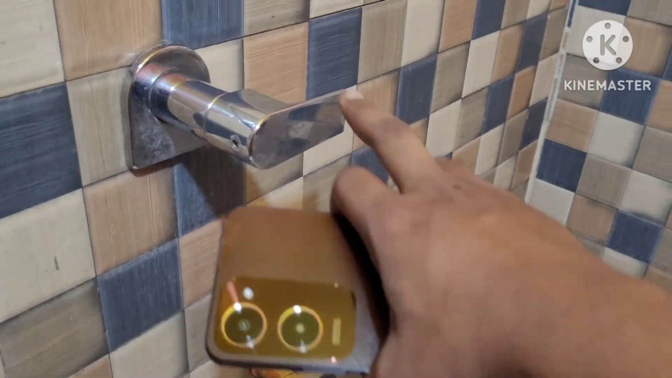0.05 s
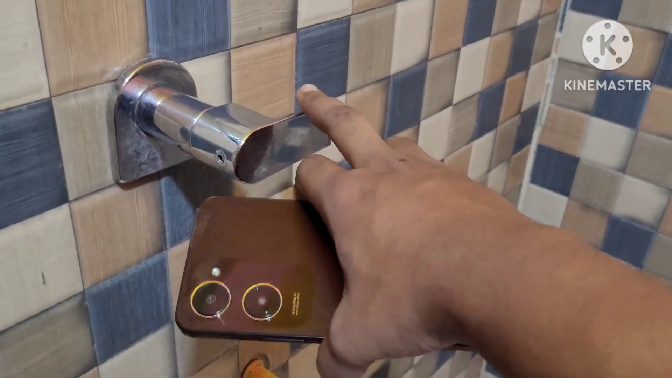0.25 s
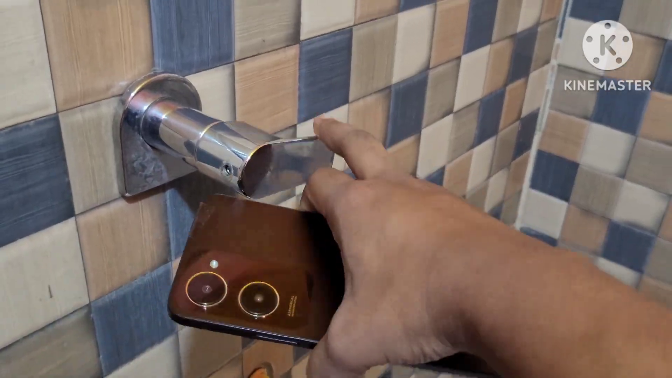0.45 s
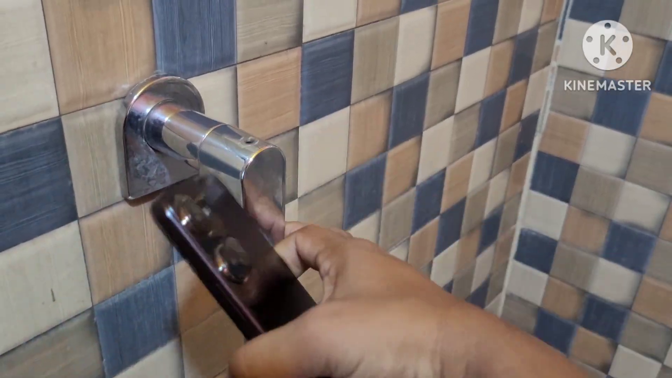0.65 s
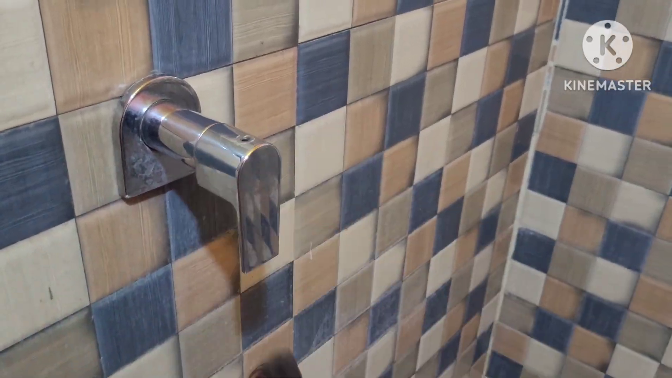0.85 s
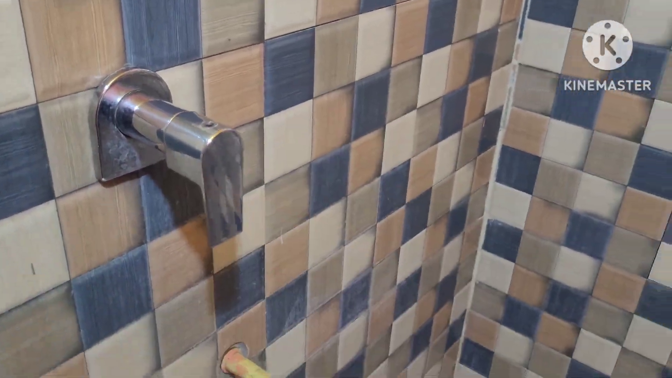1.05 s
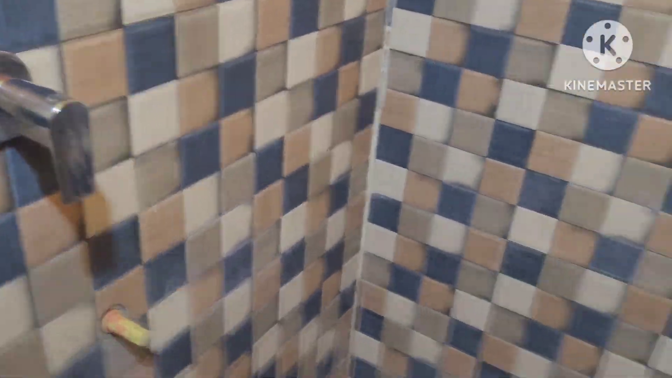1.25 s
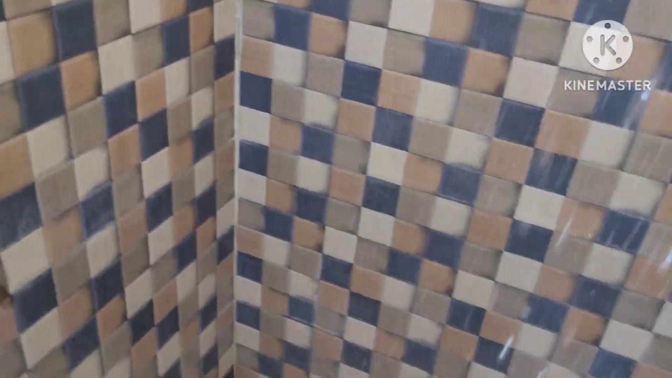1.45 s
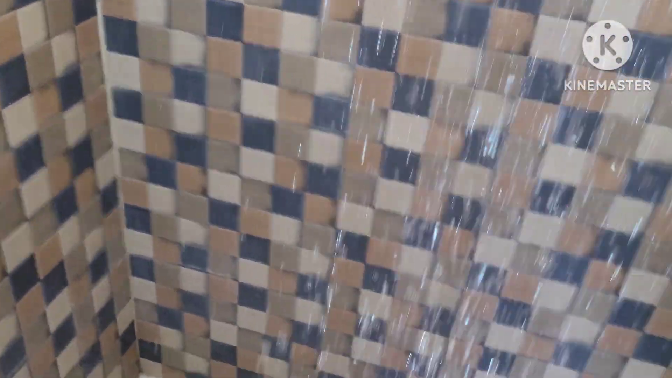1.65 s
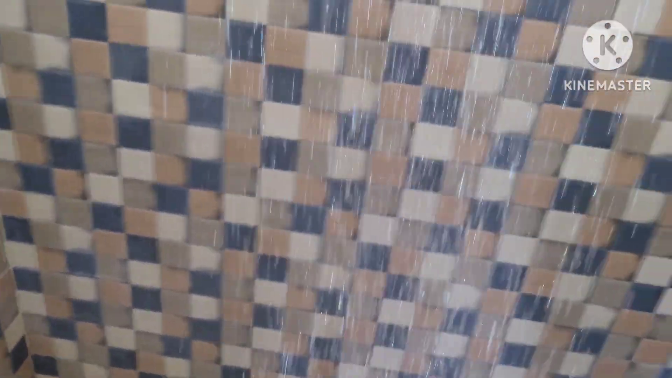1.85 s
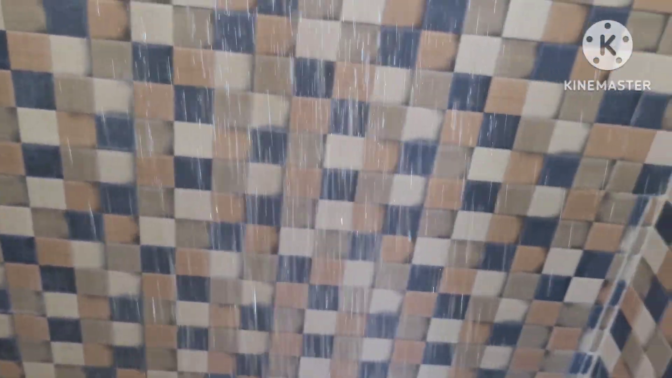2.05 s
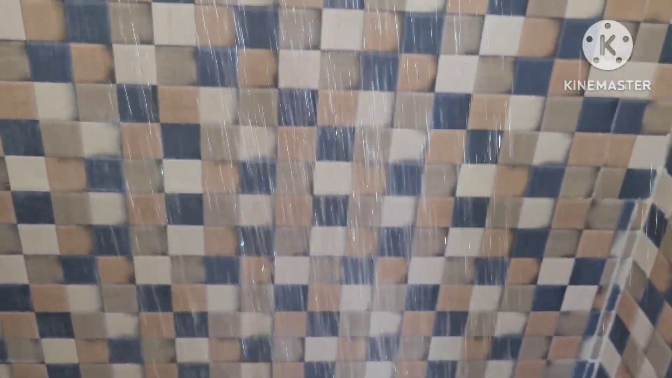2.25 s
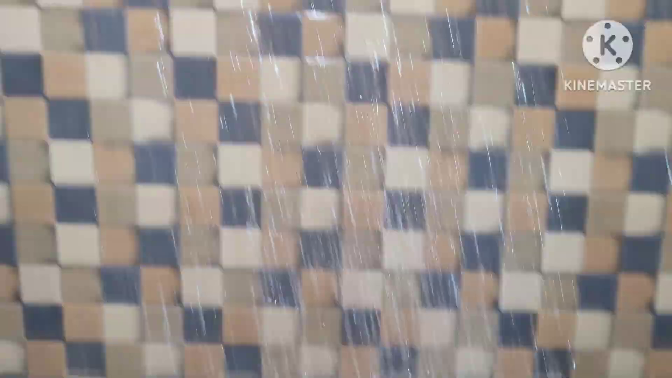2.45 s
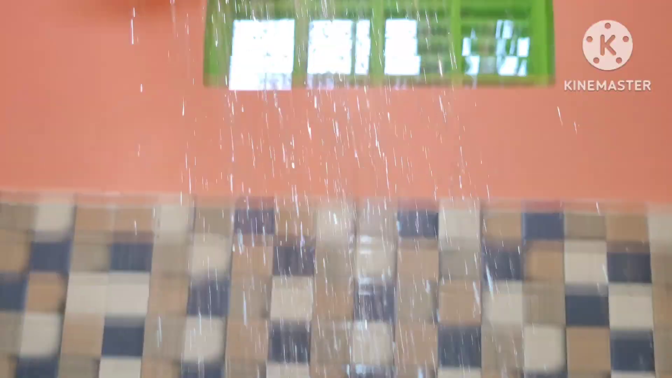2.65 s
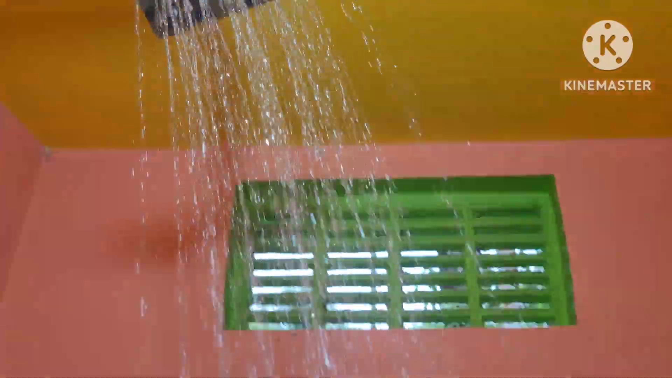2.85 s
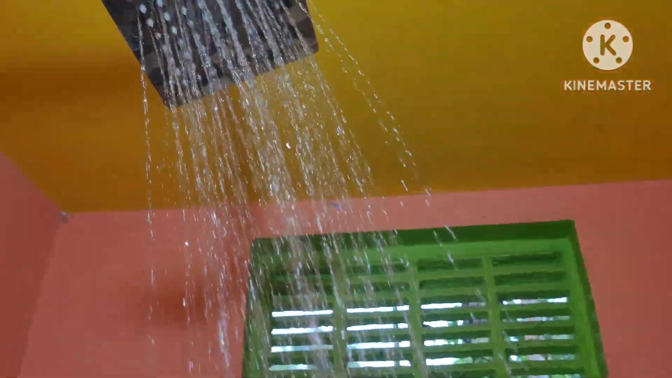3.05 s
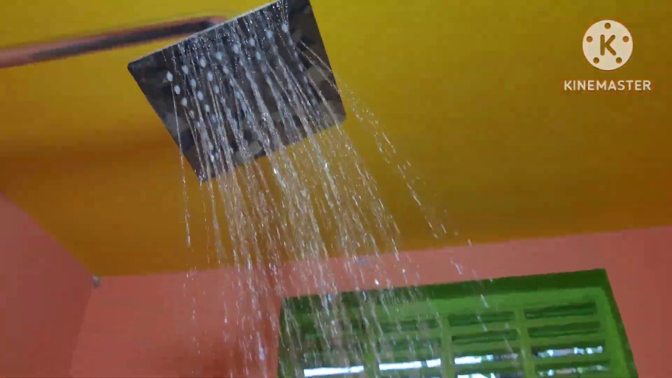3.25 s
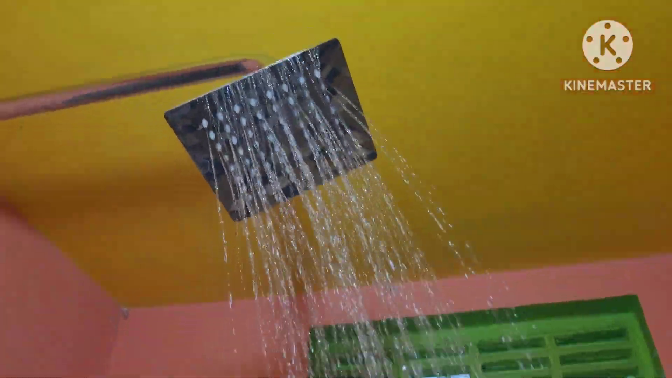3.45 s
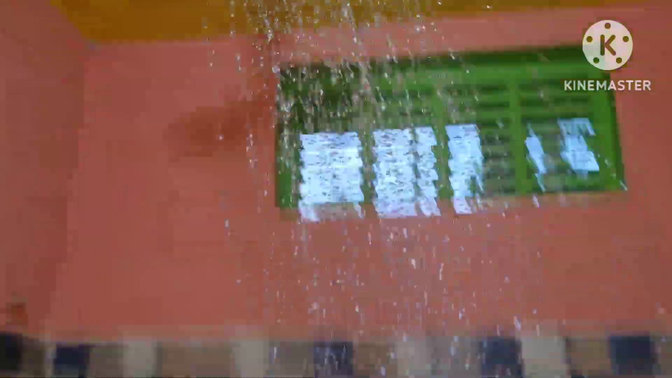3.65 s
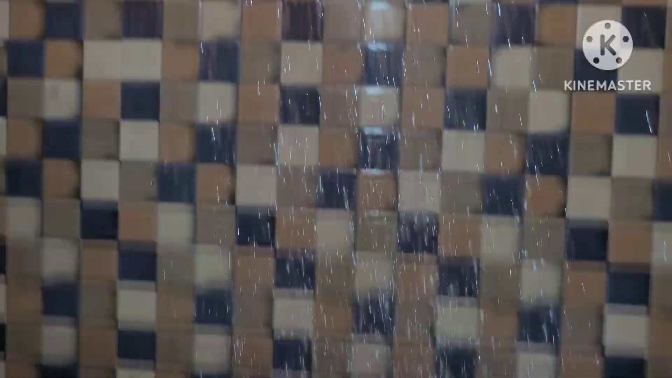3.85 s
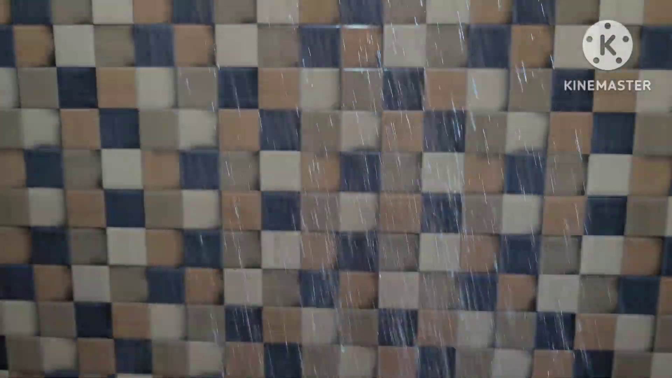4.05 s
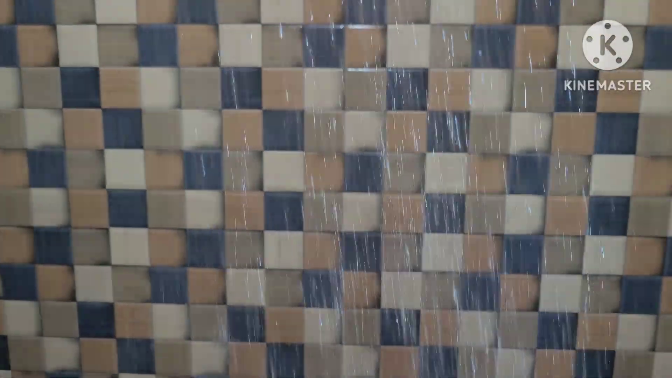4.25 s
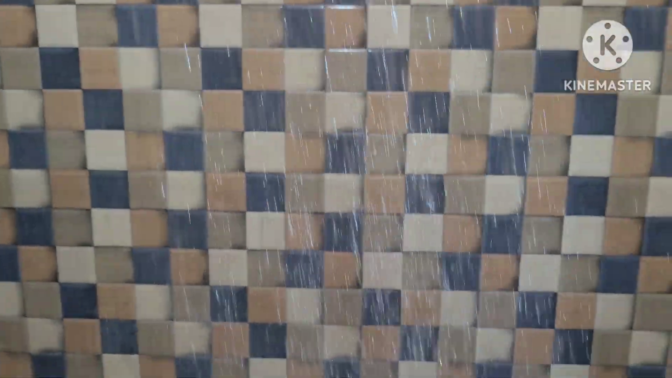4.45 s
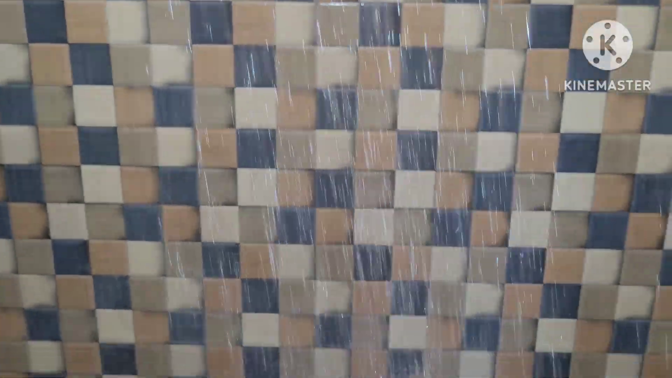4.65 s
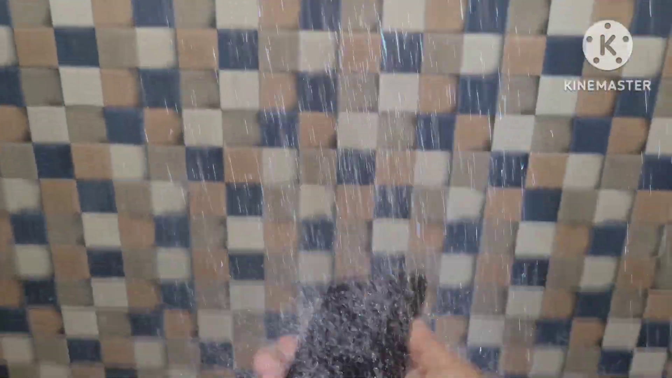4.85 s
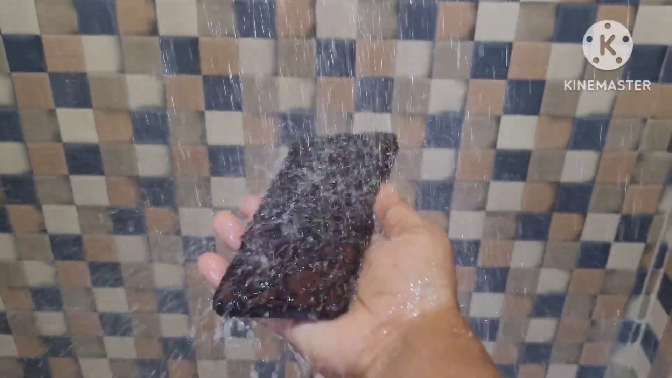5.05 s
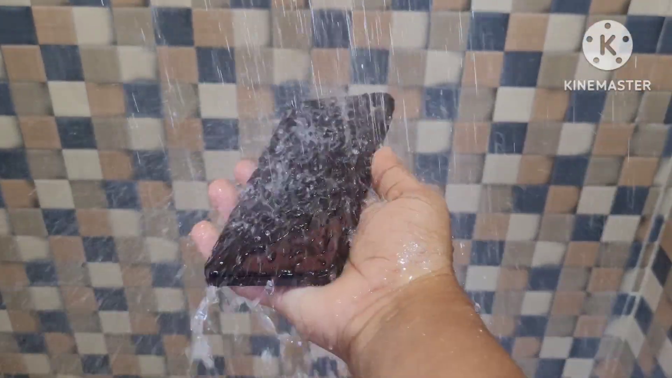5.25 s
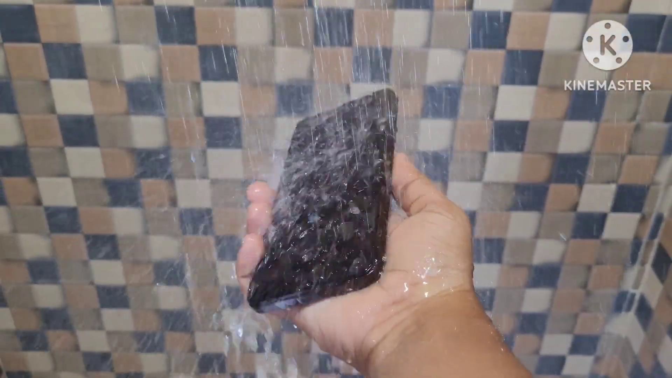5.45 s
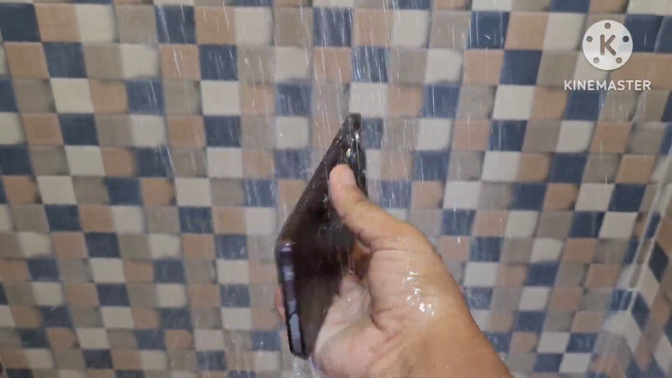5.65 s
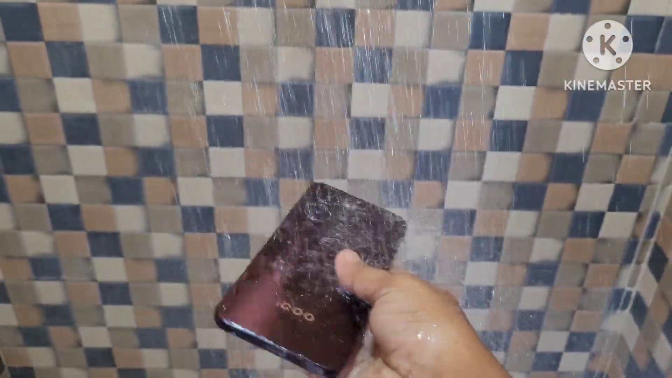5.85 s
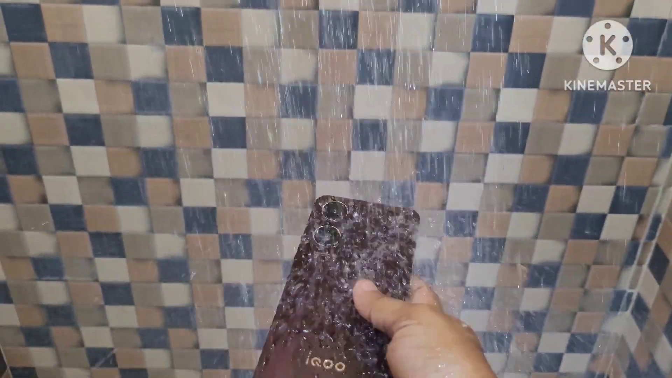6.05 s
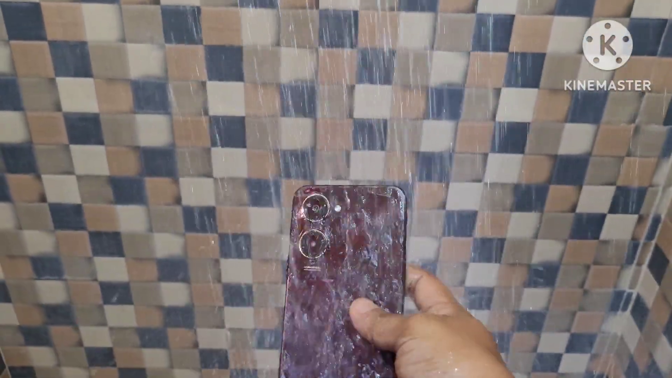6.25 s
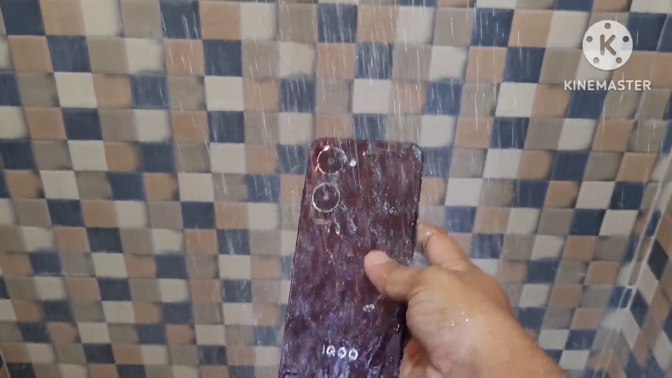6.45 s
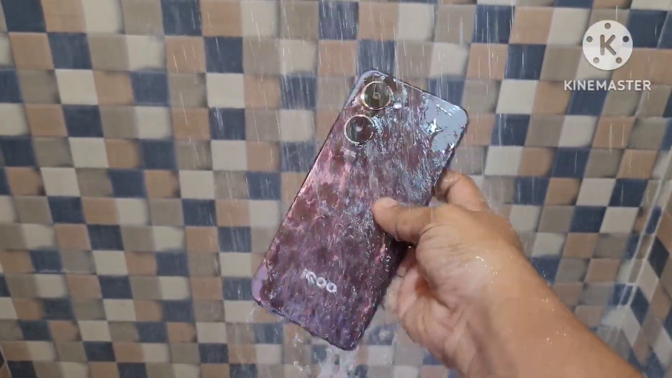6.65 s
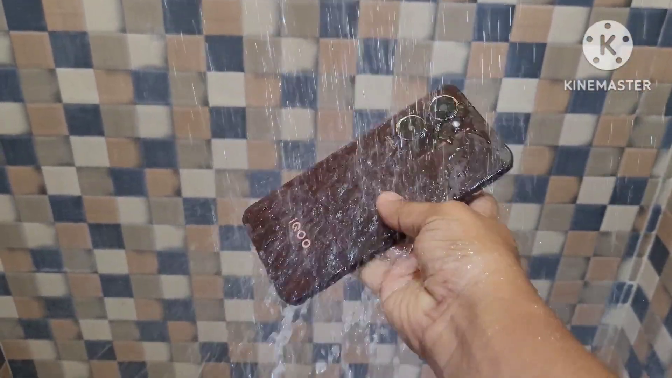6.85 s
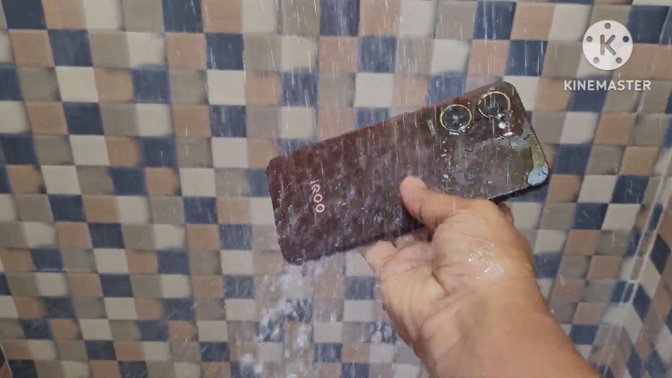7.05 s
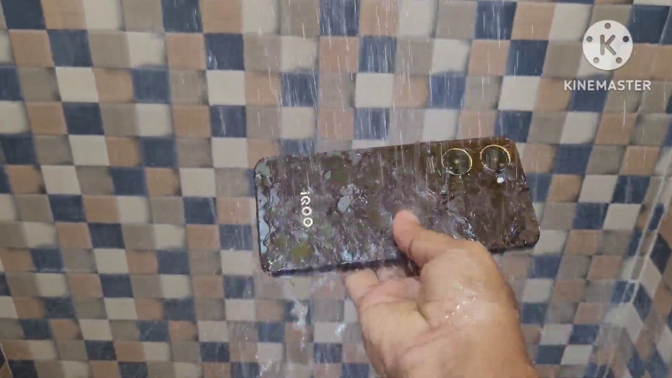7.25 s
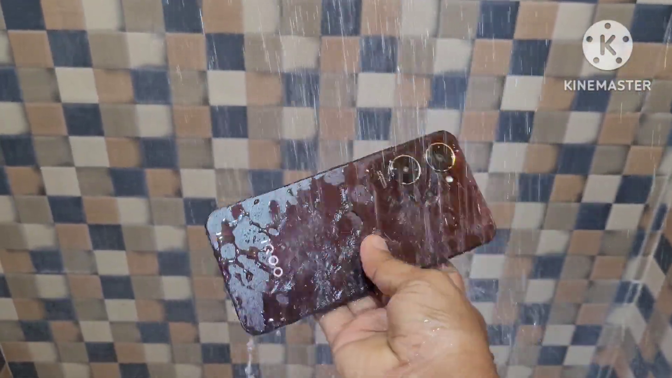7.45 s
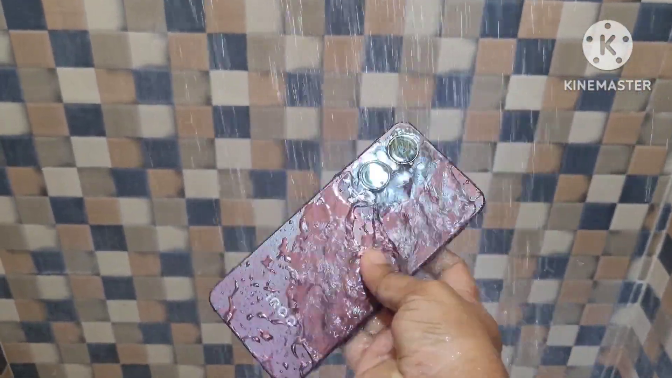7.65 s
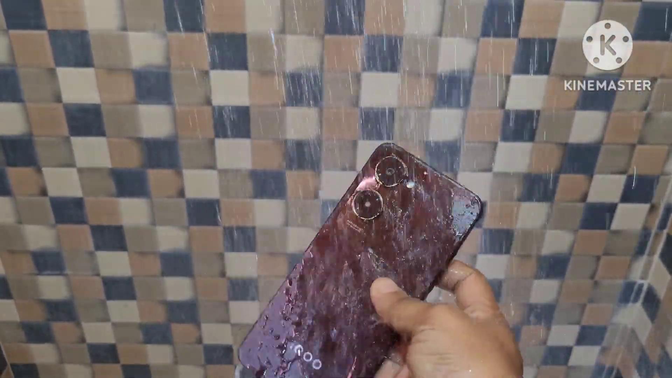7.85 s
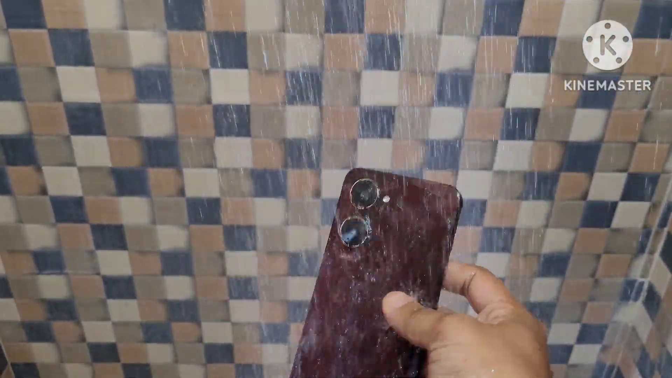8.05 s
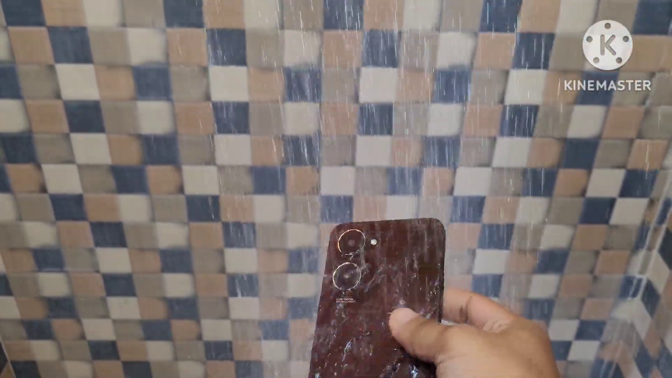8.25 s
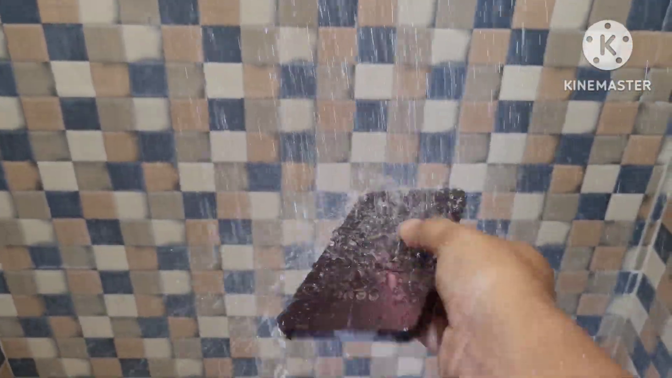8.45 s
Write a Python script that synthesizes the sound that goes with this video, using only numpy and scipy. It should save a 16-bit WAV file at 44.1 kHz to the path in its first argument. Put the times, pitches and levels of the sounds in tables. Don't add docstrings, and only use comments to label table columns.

```python
import sys
import numpy as np
from scipy import signal
from scipy.fft import rfft, irfft, next_fast_len
from scipy.io import wavfile
from scipy.ndimage import uniform_filter1d, map_coordinates

SR = 44100
rng = np.random.default_rng(int(sys.argv[2]) if len(sys.argv) > 2 else 0)


def digitize_waveform(pressure):
    field = np.atleast_2d(pressure).T
    bounded = np.clip(field, -1, 1)
    quanta = np.round(bounded * 32767).astype(np.int16)
    wavfile.write(sys.argv[1], SR, quanta)


def linear_from_db(decibels):
    return 10 ** (np.asarray(decibels, float) / 20)


N = 375291


def unit(x):
    return x / np.sqrt(np.mean(x ** 2) + 1e-20)


def along(points, hz):
    f, v = np.transpose(points)
    return np.interp(np.log(hz + 1), np.log(f + 1), v)


def curves(rows):
    s, *cols = np.transpose(rows)
    t = np.arange(N) / SR
    return [np.interp(t, s, c) for c in cols] + [(t >= s[0]) & (t <= s[-1])]


def gains(rows):
    level_db, on = curves(rows)
    return on * linear_from_db(level_db)


def wobble(rate):
    knots = rng.standard_normal(int(N * rate / SR) + 4)
    return map_coordinates(knots, [np.arange(N) * rate / SR])


def filtered(x, response):
    m = next_fast_len(x.shape[-1] + 8192)
    return irfft(rfft(x, m) * response(np.fft.rfftfreq(m, 1 / SR)), m)[..., :x.shape[-1]]


def add(track, s, piece):
    part = track[:, round(s * SR):][:, :piece.shape[-1]]
    part += piece[..., :part.shape[-1]]


def drops(n, spread_db, wet):
    size = np.minimum(rng.exponential(size=(2, n)), 4)
    sharp = rng.standard_normal((2, n)) * linear_from_db(spread_db * size)
    wet = np.clip(wet, 0, 1)
    return np.sqrt(1 - wet) * unit(sharp) + np.sqrt(wet) * rng.standard_normal((2, n))


def room(hz):
    # (frequency [Hz], width [Hz], level [dB])
    modes = [(106, 3, 8.5), (176, 9.9, 4.5), (204.2, 10, 9), (269, 10.6, 8.5), (303, 11.5, 3.5),
             (339, 7.3, 9.5), (393.8, 5.4, 7), (454, 5.1, 9.5), (530, 19, 5.5), (609, 7.3, 7), (711, 11, 6),
             (789.5, 14.3, 6), (882, 9.6, 3.5), (1010.6, 18.3, 6.5), (1084, 7.6, 1), (1180, 5.9, 1),
             (1236, 7.7, 3.5), (1330, 12, 3), (1412, 8.1, 1), (1473, 12, 3), (1700, 12.5, 4.5),
             (1734, 12, -1), (1810, 8.6, 8), (1850, 7.6, -2), (1905, 6.4, 6), (1983, 12, 4.5),
             (2150, 12, 2.5)]
    low_hz = np.arange(0, 4000, .25)
    gain = 1
    for centre, width, db in modes:
        gain = gain + linear_from_db(db) * width ** 2 / (width ** 2 + 4 * (low_hz - centre) ** 2)
    return np.interp(hz, low_hz, gain)


def rush(spectrum, patchy_db, spread_db, wet, count=N):
    # (frequency [Hz], correlation [-])
    alike = [(60, 0.94), (130, .6), (290, 0.88), (640, 0.85), (1000, 0.35), (1600, 0.081), (3100, 0.054),
             (6800, 0)]
    z = signal.stft(drops(count, spread_db, wet), nperseg=512)[2]
    field = uniform_filter1d(rng.standard_normal(z.shape[1:]), 8, 0)
    field = uniform_filter1d(field, 8, 1)
    pair = signal.istft(z * linear_from_db(patchy_db * unit(field)), nperseg=512)[1][:, :count]

    def mid_side(hz):
        turn = np.arccos(np.clip(along(alike, hz), -1, 1)) / 2
        return room(hz) * linear_from_db(along(spectrum, hz)) * [np.cos(turn), np.sin(turn)]

    mid, side = filtered(pair, mid_side)
    return np.pad(unit(np.array([mid + side, mid - side])), [(0, 0), (0, N - count)])


def splashes(rows, trim_db, crack_db, tail_db, tail_s, shared):
    out, t = np.zeros((2, N)), np.arange(SR // 2) / SR
    for s, db, centre_hz, t60, octaves in rows:
        band = lambda hz: np.exp(-.5 * (np.log2((hz + 1) / centre_hz) / octaves) ** 2)
        rise = 1 - np.exp(-t * centre_hz / 3)
        crack = linear_from_db(crack_db - 60 * t / 0.084)
        shape = rise * (crack + linear_from_db(-60 * t / t60) + linear_from_db(tail_db - 60 * t / tail_s))
        pair = drops(len(t), spread_db=4.5, wet=0.37)
        add(out, s, linear_from_db(db + trim_db) * shape * unit(filtered(pair + shared * pair[::-1], band)))
    return out


def tilted(x):
    # (time [s], left port lag [ms])
    lag = [
        (0, 0.11),
        (1.5, 0.25),
        (2.6, 0.23),
        (4, 0.22),
        (4.6, 0.012),
        (8.6, 0.035),
    ]
    sway_ms, sway_rate_hz = .1, 6
    late = np.interp(np.arange(N) / SR, *np.transpose(lag)) * SR / 1000
    at = np.arange(N) + sway_ms * wobble(sway_rate_hz) * SR / 1000
    return np.array([map_coordinates(x[0], [at - late]), map_coordinates(x[1], [at])])


def still_air():
    # (frequency [Hz], density [dB per Hz])
    quiet = [(15, -38), (25, -6.5), (113, -15), (136, -13), (253, -19.5), (282, -15), (332, -17),
             (948, -25), (2710, -29.5), (3100, -28), (4520, -31), (5760, -15), (7200, -16.5), (7900, -37.5),
             (9000, -28), (9600, -48.5), (11600, -46), (12600, -27), (13400, -17), (14300, -26),
             (15600, -34)]
    return linear_from_db(-77 + 2.0) * rush(quiet, patchy_db=-4.0, spread_db=-19.0, wet=0.81)


def rubbing():
    # (time [s], pressure [dB])
    grip = [
        (0.0, -31),
        (0.024, -30),
        (0.15, -29),
        (0.184, -32.5),
        (0.2, -39),
        (0.238, -37.5),
        (0.2525, -44.5),
    ]
    # (frequency [Hz], density [dB per Hz])
    rumble_colour = [(12, -52), (20, -28), (43, -2), (55, -0.5), (80, -8.5), (108, -6.5), (139, -21.5),
                     (211, -23), (500, -36), (650, -71), (1100, -120)]
    # (frequency [Hz], density [dB per Hz])
    rustle_colour = [(180, -14), (300, -10.5), (469, -17.5), (553, -13), (1090, -17.5), (2660, -31.5),
                     (3040, -27.5), (3580, -40), (6800, -47), (7900, -62.5), (9700, -58), (10350, -38),
                     (11500, -49), (13000, -56), (15300, -48)]
    count = round(.3 * SR)
    pressure_db, on = curves(grip)
    rumble = on * linear_from_db(pressure_db)
    rustle = on * linear_from_db(-50.5 + 0.91 * (pressure_db + 31.0))

    def skin(colour):
        noise = rng.standard_normal((2, count))
        noise = unit(filtered(noise, lambda hz: linear_from_db(along(colour, hz))))
        return np.resize(noise.T, (N, 2)).T

    port_tilt = linear_from_db([[-2.5], [2.5]])
    return linear_from_db(3.0) * (rumble * skin(rumble_colour) * port_tilt + rustle * skin(rustle_colour))


def fingertip():
    # (time [s], peak [dB], frequency [Hz], rise [s], fall [s])
    thump = (.1712, -17.5, 135, .0012, .0045)
    # (time [s], peak [dB], frequency [Hz], t60 [s], width [octaves])
    skin_tick = [
        (.2045, -46, 3500, .02, 1.1),
    ]
    s, db, hz, rise_s, fall_s = thump
    near = np.arange(N) / SR - s
    swell = np.exp(-.5 * (near / np.where(near < 0, rise_s, fall_s)) ** 2)
    pad = linear_from_db(db) * np.cos(2 * np.pi * hz * near) * swell * [[1.9], [-.35]]
    return pad + splashes(skin_tick, trim_db=-9, crack_db=-21, tail_db=-40, tail_s=.05, shared=0)


def drop_ticks():
    # (time [s], peak [dB], frequency [Hz], left minus right [dB])
    ticks = [(.2059, -50, 5000, 0), (.8713, -46, 9000, 6), (1.5469, -29, 2600, 5), (1.5787, -32, 4000, -6),
             (1.6905, -28, 1850, 0), (1.7644, -32, 7000, 6), (4.3927, -28, 8000, -6),
             (4.6127, -23.5, 7500, 0), (5.0101, -23, 7000, -8), (5.1701, -26, 8000, -6),
             (5.3653, -24, 6000, -5), (5.6528, -22, 6000, 0), (5.7893, -22, 3900, 2),
             (5.7922, -18, 3930, 4), (5.9544, -22, 6500, 0), (6.2254, -21.5, 7000, 4),
             (7.0199, -17.5, 5500, 2), (7.0944, -21, 5030, 5), (7.1764, -24, 7000, -5),
             (7.2157, -26, 7500, -5), (7.5625, -25, 6000, -1), (7.7486, -21.5, 5500, 3),
             (8.013, -20, 5500, 5), (8.3518, -24, 8000, -5)]
    half_cycles = .62
    out, t = np.zeros((2, N)), np.arange(-60, 60) / SR
    for s, db, hz, pan_db in ticks:
        tick = np.cos(2 * np.pi * hz * t) * np.exp(-.5 * (t * hz / half_cycles) ** 2)
        add(out, s + t[0], linear_from_db(db - 1 + pan_db * np.array([[.5], [-.5]])) * tick)
    return out


def trapped_air():
    # (time [s], level [dB])
    seep = [
        (.47, -97),
        (.56, -81.5),
        (.63, -78),
    ]
    # (frequency [Hz], density [dB per Hz])
    valve_colour = [(2800, -50), (3050, 0), (3400, -5), (4200, -14), (9000, -30), (9700, -16), (10400, -37)]
    # (time [s], gurgle [dB])
    creep = [
        (0.62, -74),
        (0.692, -62.5),
        (0.758, -67.5),
        (0.818, -57.5),
        (0.94, -75),
        (0.944, -65),
        (1.024, -77),
        (1.085, -82),
    ]
    # (time [s], air [dB], tightness [dB])
    coughs = [
        (1.1, -48, -24),
        (1.136, -35.5, -11),
        (1.194, -31, -7.5),
        (1.274, -37, -2.5),
        (1.292, -38.5, -3),
        (1.35, -33.5, 5.5),
        (1.39, -36.5, 5.5),
        (1.43, -34.5, -2),
        (1.512, -44, -8),
    ]
    # (time [s], air [dB], tightness [dB])
    sputter = [
        (1.544, -45.5, 1),
        (1.682, -53.5, -1.5),
        (1.69, -53.5, 2),
        (1.736, -54, -1),
        (1.77, -57.5, 0),
        (1.892, -57.5, 4.5),
        (2.022, -58, 6.5),
        (2.172, -68, -4),
        (2.2, -58, -5),
    ]
    # (frequency [Hz], density [dB per Hz])
    cough_colour = [(240, -29), (400, -10.5), (576, -10), (1050, -1.5), (1280, -2.5), (1660, -11),
                    (2820, -120)]
    # (frequency [Hz], density [dB per Hz])
    rasp_colour = [(750, -37), (1280, -7.5), (1860, 0), (2300, -6.5), (2990, -40), (5060, -120)]
    # (frequency [Hz], density [dB per Hz])
    sizzle_colour = [(1800, -33), (2300, 0), (3600, -6), (6000, -8), (9500, -23.5), (13000, -52)]
    # (frequency [Hz], density [dB per Hz])
    boom_colour = [(18, -51), (30, -38), (103, -6.5), (140, -29), (184, -9), (450, -16), (580, -46),
                   (990, -120)]
    sizzle_start_s, sizzle_rise_s, boom_fade_db_per_s = 1.096, 0.048, -12
    n, t = round(2.3 * SR), np.arange(N) / SR
    gurgle_db, climbing = curves(creep)
    air_db, tight_db, blowing = curves([*coughs, *sputter])
    late_db = tight_db * (t > sputter[0][0])
    wetted = np.clip((t - sizzle_start_s) / sizzle_rise_s, 0, 1) ** 2

    cough = climbing * linear_from_db(gurgle_db - 3) + blowing * linear_from_db(air_db)
    rasp = climbing * linear_from_db(gurgle_db - 2.5) + blowing * linear_from_db(air_db + tight_db)
    sizzle = climbing * linear_from_db(gurgle_db - 1)
    sizzle = sizzle + blowing * wetted * linear_from_db(-41.5 + 0.52 * (air_db + 38.5) + 0.96 * late_db)
    boom = climbing * linear_from_db(-75 + 0.24 * (gurgle_db + 74))
    boom = boom + blowing * linear_from_db(air_db - 14 + boom_fade_db_per_s * (t - coughs[0][0]))

    ragged = linear_from_db(0.26 * wobble(59.4))
    air = cough * ragged * rush(cough_colour, patchy_db=2.5, spread_db=9.0, wet=0.71, count=n)
    air += rasp * ragged * rush(rasp_colour, patchy_db=2.5, spread_db=4, wet=0.98, count=n)
    air += sizzle * rush(sizzle_colour, patchy_db=2.5, spread_db=2.5, wet=0.28, count=n)
    air += boom * rush(boom_colour, patchy_db=0.0, spread_db=3.5, wet=0.69, count=n)
    air += gains(seep) * rush(valve_colour, patchy_db=1.5, spread_db=3, wet=.8, count=SR)
    return air


def shower_head():
    # (time [s], peak [dB], frequency
    # [Hz], t60 [s], width [octaves])
    spits_and_gulps = [(.671, -45.5, 9100, 0.17, .2), (.787, -39, 8500, 0.17, 0.12), (.87, -43.5, 8700, 0.22, 0.14),
                       (1.128, -17.5, 1043, 0.15, 0.023), (1.546, -27, 1510, 0.057, 0.82),
                       (1.688, -22, 1810, .1, 0.13), (1.71, -25, 1830, 0.087, 0.082), (1.931, -23, 1750, 0.06, 0.13),
                       (1.931, -25, 2450, .1, 0.094), (1.845, -30.5, 2470, 0.28, 0.37),
                       (1.945, -39, 607.4, 0.64, 0.013), (2.2, -43.5, 1790, 1.6, 0.046),
                       (2.68, -43.5, 1740, 3.1, 0.063), (6.78, -45, 205, 0.26, 0.036), (8.16, -42, 345, .3, 0.08),
                       (.7, -48, 168, 0.96, 0.026), (.8, -51, 206, 0.49, 0.045), (1.689, -32, 3440, 0.39, 0.14),
                       (2.24, -45, 2210, 1.05, 0.043), (2.67, -45, 2200, 2.8, 0.07),
                       (1.12, -38.5, 4200, 0.22, .015), (.66, -59, 106, 1.6, .05), (1.14, -43, 105.5, 1.2, .05),
             (1.1, -36.5, 107.5, 1.1, 0.055), (1.15, -27, 1420, .4, .08), (1.188, -20, 1205, .3, .05),
             (1.208, -21, 3740, 0.52, 0.58), (1.27, -28, 3520, 0.47, .04), (1.296, -26, 2580, .2, .06),
             (1.33, -26, 2100, 0.22, .1), (1.32, -21, 1330, .8, 0.13), (1.345, -23, 1930, .3, .07),
             (1.385, -22, 1720, .35, .07), (1.36, -23, 795, 0.49, 0.15), (1.405, -22, 1100, 0.22, .08),
             (1.378, -17.5, 1050, 0.37, 0.08), (1.395, -19, 1560, 0.29, 0.077), (1.3, -29, 1500, 0.24, 0.1),
             (1.43, -31, 3600, 0.19, .06), (1.37, -38, 1340, 0.15, .1), (1.9, -45, 398, 0.85, 0.024),
             (1.88, -32, 2000, .2, .1), (2.1, -37, 2000, 0.17, 0.13), (1.8, -35, 1740, .2, .1),
             (1.985, -37, 3470, 0.64, 0.086), (1.86, -36.5, 3600, 0.45, .1), (1.53, -31, 1020, 0.33, 0.089),
             (0.68, -51, 1400, .2, .3), (2.98, -58, 136, 1.3, 0.43), (3.28, -56.5, 150, 0.94, 0.44)]
    pops = splashes(spits_and_gulps, trim_db=-13.0, crack_db=-17, tail_db=-13.5, tail_s=0.36, shared=0.47)
    return tilted(linear_from_db(2.5) * trapped_air() + pops)


def spray():
    # (time [s], flow [dB], coarseness [dB])
    jets = [(0.5, -99, 8), (0.7, -66, -5), (0.79, -68, 3.5), (1.1, -80.5, -5.5), (1.19, -48.5, 1),
            (1.3, -53, 0.5), (1.71, -50, 1.5), (1.76, -37.5, -8.5), (2.04, -36.5, -6.5),
            (2.17, -40.5, -6.5), (4.47, -40, -4.5), (4.78, -41, -6.5), (5.4, -40.5, -2), (5.67, -41.5, -3),
            (6.41, -46, -2), (7.1, -42, -2), (8.28, -43.5, -0.5), (8.51, -41, -3.5)]
    # (time [s], extra level [dB])
    surges = [(1.76, 2), (2.02, 2), (3.47, 1), (5.18, 3.5), (5.29, 0.5), (5.46, 0), (5.757, 5.5),
              (5.979, 3), (6.223, 5.5), (6.592, 1.5), (7.71, 1), (8.358, 3)]
    # (frequency [Hz], density [dB per Hz])
    fizz_colour = [(1290, -35.5), (2200, -16.5), (2460, -12.5), (3290, -6.5), (5800, -0.5), (7700, -1.5),
                   (8780, -3), (10400, -15), (11500, -11), (15000, -5), (22000, -120)]
    # (frequency [Hz], density [dB per Hz])
    mist_colour = [(5600, -14), (9500, 12.5), (10900, 3), (13000, 16), (15000, 21.5)]
    rise_s, fall_s = 0.0068, 0.13
    flow_db, coarse_db, on = curves(jets)
    surge_db = np.zeros(N)
    for s, db in surges:
        since = np.maximum(np.arange(N) / SR - s, 0)
        surge_db += db * np.minimum(since / rise_s, 1) * np.exp(-since / fall_s)
    fizz = on * linear_from_db(flow_db + coarse_db + 1.96 * surge_db)
    mist = on * linear_from_db(flow_db + surge_db)
    flicker_db = 0.51 * wobble(11.0) + 0.82 * wobble(30)
    fine = fizz * rush(fizz_colour, patchy_db=0.68, spread_db=4.0, wet=0.77)
    fine += mist * rush(mist_colour, patchy_db=1.5, spread_db=8.0, wet=0.97)
    return linear_from_db(2 + flicker_db) * fine


def side_splashes():
    # (time [s], peak [dB], frequency [Hz], t60 [s], width [octaves])
    glints = [
        (4.34, -38.5, 3300, .3, .1),
        (5, -36.5, 8900, .3, 0.063),
        (5.702, -34, 8600, .25, .08),
        (7.562, -33, 8800, .3, 0.073),
        (8, -36, 6400, 0.44, .2),
        (8.165, -45.5, 272, 0.55, 0.037),
        (1.142, -20.5, 1040, .1, .03),
        (7.9, -46, 790, .5, .03),
        (7.68, -46, 790, .4, .03),
    ]
    return splashes(glints, trim_db=-10, crack_db=-15, tail_db=-25, tail_s=.4, shared=.3)


def floor_water():
    # (time [s], splashing [dB])
    pool_rows = [(2.2, -66), (2.52, -66), (2.99, -70), (3.3, -68.5), (3.73, -66), (4.27, -66.5),
                 (4.61, -58.5), (4.99, -56.5), (5.42, -56.5), (5.63, -62), (5.77, -65), (5.82, -55),
                 (6.0, -48.5), (6.4, -57), (6.85, -54.5), (7.08, -50.5), (8.3, -58.5), (8.51, -49.5)]
    # (time [s], level [dB])
    palm = [
        (4.4, -64.5),
        (4.65, -59),
        (5.1, -56.5),
        (5.5, -56),
        (5.68, -66),
    ]
    # (frequency [Hz], density [dB per Hz])
    drum_colour = [(15, -52), (25, -34), (134, -29), (204, -9.5), (237, -18), (401, 0.5), (786, -2),
                   (900, -2), (1170, -22), (1980, -120)]
    # (frequency [Hz], density [dB per Hz])
    patter_colour = [(440, -64), (750, -8.5), (916, -13), (994, -2.5), (1360, -3), (1600, -1.5),
                     (2080, -36), (3520, -120)]
    # (frequency [Hz], density [dB per Hz])
    tinkle_colour = [(880, -46), (1500, -9), (1570, -6), (2110, -0.5), (3200, -0.5), (4160, -8.5),
                     (7040, -120)]
    # (frequency [Hz], density [dB per Hz])
    cup_colour = [(1150, -41), (1280, 2.5), (1440, 2), (1560, -21.5)]
    deepens_db_per_s, brightens_db_per_s = 0.56, 0.68
    splash_db, on = curves(pool_rows)
    since = np.arange(N) / SR - pool_rows[0][0]
    drum = on * linear_from_db(-65.5 + 0.46 * (splash_db + 58.0) + deepens_db_per_s * since)
    patter = on * linear_from_db(splash_db)
    tinkle = on * linear_from_db(-57 + 0.84 * (splash_db + 60) + brightens_db_per_s * since)
    pool = drum * rush(drum_colour, patchy_db=0.0, spread_db=1.5, wet=0.64)
    pool += patter * rush(patter_colour, patchy_db=1.5, spread_db=7.5, wet=0.76)
    pool += tinkle * rush(tinkle_colour, patchy_db=1.5, spread_db=2.0, wet=0.8)
    pool += gains(palm) * rush(cup_colour, patchy_db=-0.5, spread_db=-6.0, wet=0.67, count=round(5.8 * SR))
    return linear_from_db(3.0) * tilted(pool)


def case_knocks():
    # (time [s], peak [dB], frequency [Hz], t60 [s], contact [s])
    knocks = [
        (2.476, -35, 164, 0.031, 0.00006),
        (2.5047, -31.5, 166, 0.028, 0.000056),
    ]
    out, t = np.zeros((2, N)), np.arange(SR // 10) / SR
    for s, db, hz, t60, contact_s in knocks:
        blow = t / contact_s * np.exp(1 - t / contact_s)
        swing = -np.sin(2 * np.pi * hz * t) * (1 - np.exp(-t / contact_s)) * linear_from_db(-60 * t / t60)
        add(out, s, linear_from_db(db - 3.5) * (linear_from_db(5.0) * blow + 0.62 * swing) * linear_from_db([[2], [-2]]))
    return out


def water_slaps():
    # (time [s], peak [dB], frequency [Hz], t60 [s], width
    slaps = [
        (2.956, -44, 5100, 0.31, 0.15),
        (3.435, -37, 8030, 0.36, 0.46),
        (3.7348, -37, 5800, 0.24, 0.25),
        (4.2118, -32, 6050, 0.15, 0.67),
        (4.611, -36, 7040, 0.47, 0.59),
             (4.978, -36, 5240, 0.26, 0.56), (5.008, -32.5, 5800, 0.35, 0.5),
                    (5.064, -28.5, 5630, 0.28, 0.41), (5.1697, -38, 5900, 0.46, 0.6),
                    (5.236, -25.5, 5900, 0.4, 0.47), (5.288, -29, 5100, 0.28, 0.27),
                    (5.385, -29, 5200, .25, 0.22), (5.453, -32, 7500, .3, .4),
                    (5.2735, -25, 4770, 0.26, 0.52), (5.363, -24, 5230, 0.38, 0.5),
                    (5.578, -31.5, 5870, 0.46, 0.45), (5.629, -33, 5800, .3, 0.37),
                    (5.6494, -26, 5640, 0.89, 0.47), (5.7016, -24, 5270, 0.23, 0.55),
                    (5.7879, -21, 3860, 0.32, 0.38), (5.81, -28, 3700, 0.4, .3),
                    (5.875, -27, 4970, 1, 0.63),
             (5.99, -33.5, 4600, 0.7, 0.31), (6.2243, -27.5, 7300, 0.17, 0.25),
                  (6.3569, -28.5, 6340, 0.48, 0.32), (6.59, -39, 7100, 0.36, 0.39),
                  (6.629, -22, 5300, 0.41, 0.4), (6.719, -25, 4800, 0.29, 0.53),
                  (6.72, -34, 8400, .4, 0.12), (6.8034, -27.5, 5200, 0.5, 0.3),
                  (6.86, -31, 3000, 1.0, 0.83), (7.015, -19.5, 5470, 0.64, 0.39),
                  (7.0921, -24, 4600, 0.42, 0.52), (7.173, -28.5, 4070, 0.92, 0.69),
                  (7.2764, -30.5, 5900, 0.48, 0.23), (7.354, -28, 6300, 0.67, 0.41),
                  (7.5614, -23, 5600, 0.35, 0.46), (7.6163, -24, 4440, 0.35, 0.56),
                  (7.6413, -23, 5630, 0.34, 0.41), (7.748, -25.5, 5530, 0.42, 0.36),
                  (7.877, -30.5, 6750, 0.2, 0.33), (8.0118, -23.5, 5130, 0.45, 0.49),
                  (8.075, -32.5, 6800, 0.62, .3), (8.475, -27.5, 4900, .5, .3),
                  (7.775, -34, 6000, 0.64, 0.17), (8.31, -32, 6000, .4, .4),
                  (8.2344, -35.5, 4800, 0.98, 0.58), (8.35, -29.5, 7600, 0.23, 0.26),
                  (8.458, -27, 5000, 0.98, 0.35)]
    lumps = slaps
    return splashes(lumps, trim_db=-9.0, crack_db=-14.5, tail_db=-16.0, tail_s=0.84, shared=0)


def scene():
    hand = rubbing() + fingertip() + case_knocks()
    water = shower_head() + spray() + floor_water() + water_slaps()
    return still_air() + hand + water + drop_ticks() + side_splashes()


def low_pass(x):
    return signal.sosfilt(signal.butter(12, 15530, fs=SR, output="sos"), x)


def record(dry):
    # (frequency [Hz], left minus right [dB])
    ports = [(60, -1), (92, 4.5), (140, 2), (210, 1.5), (330, 1), (500, 1), (770, 0.5), (1170, 2.5),
             (1790, 2), (2740, 3), (4190, 5), (6410, 4), (9810, -11.5), (15000, -4)]
    top_hz = 15540
    mix = filtered(dry, lambda hz: linear_from_db(along(ports, hz) * [[.5], [-.5]]) * (hz < top_hz))
    return low_pass(mix)


dry = scene()
out = record(dry)
digitize_waveform(out)
```